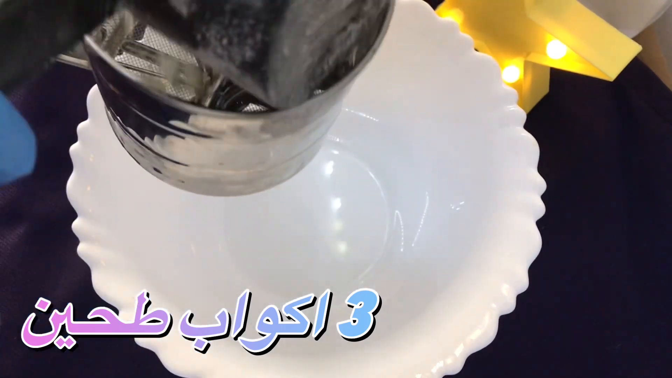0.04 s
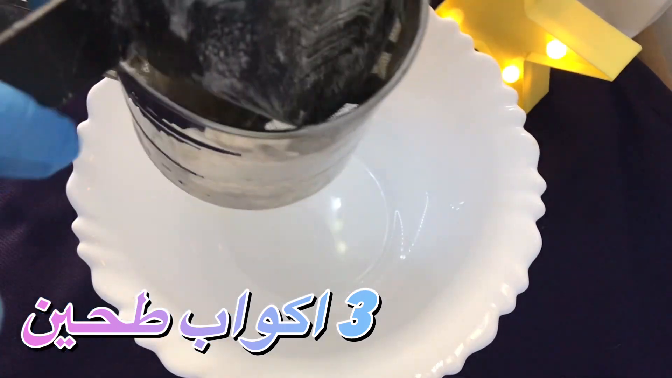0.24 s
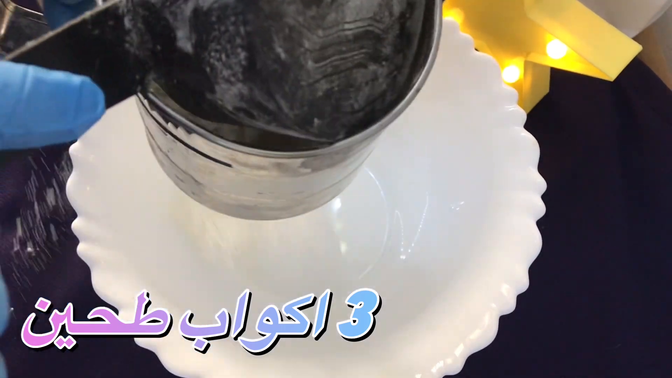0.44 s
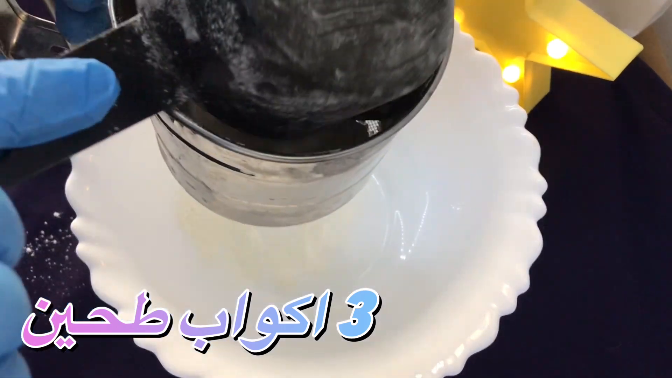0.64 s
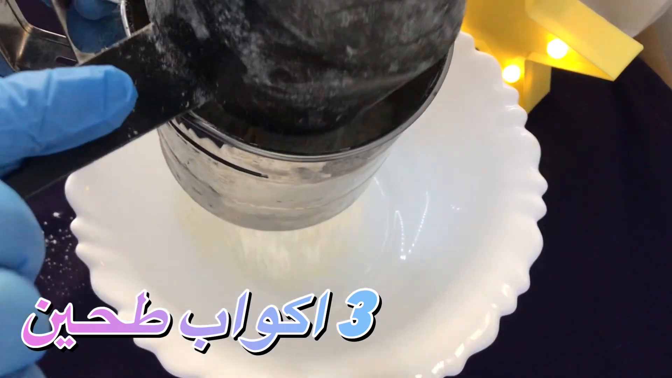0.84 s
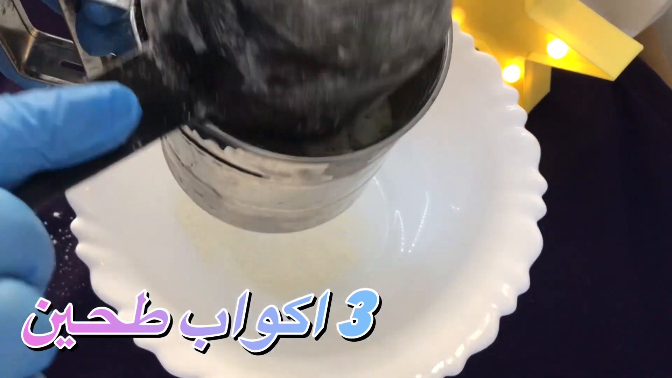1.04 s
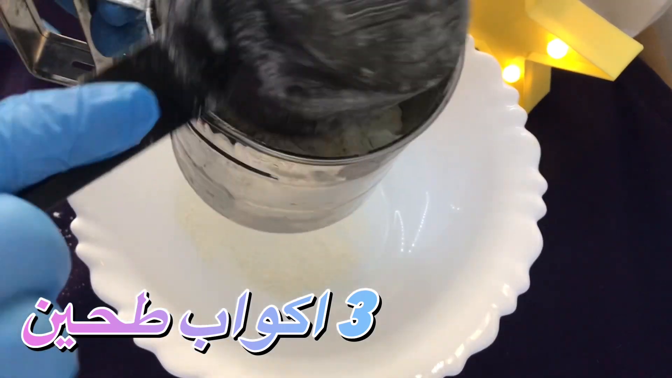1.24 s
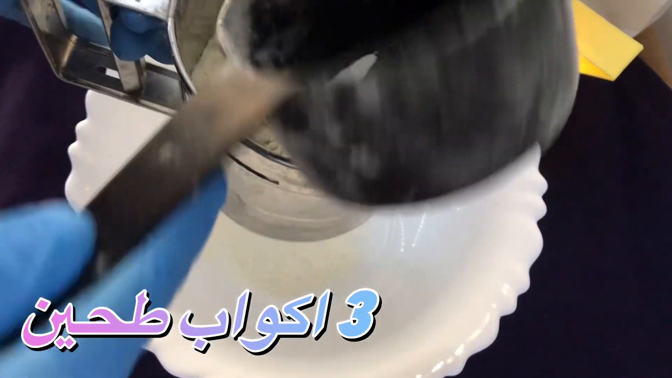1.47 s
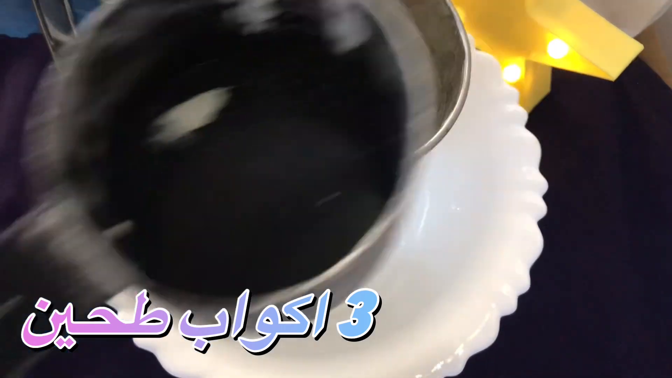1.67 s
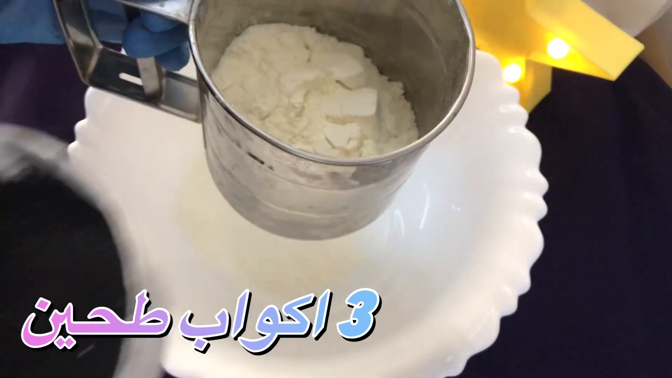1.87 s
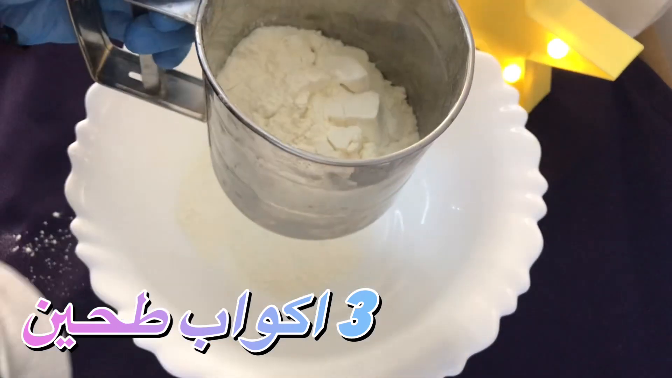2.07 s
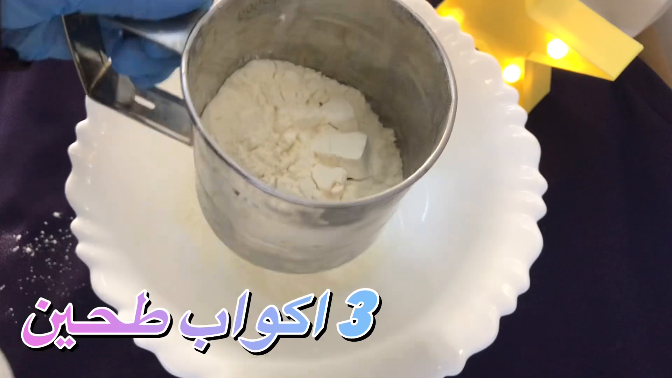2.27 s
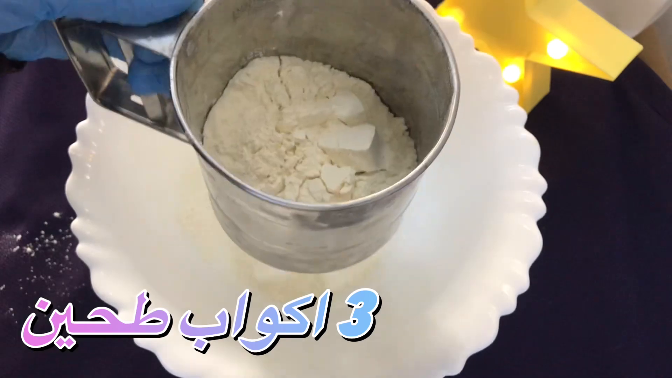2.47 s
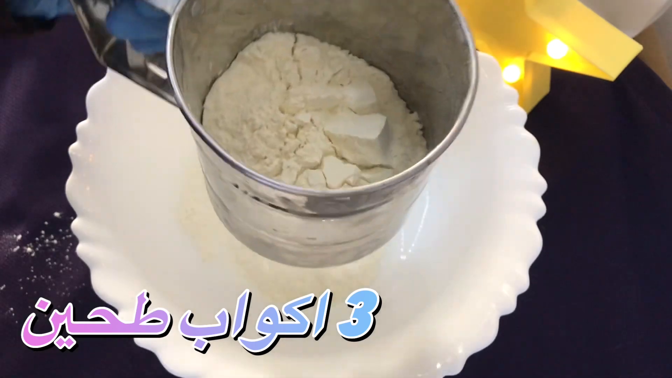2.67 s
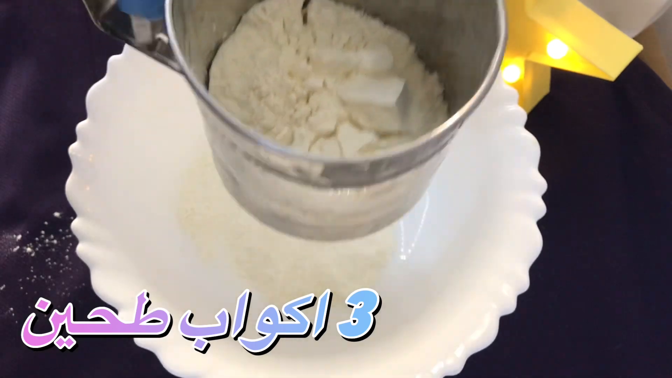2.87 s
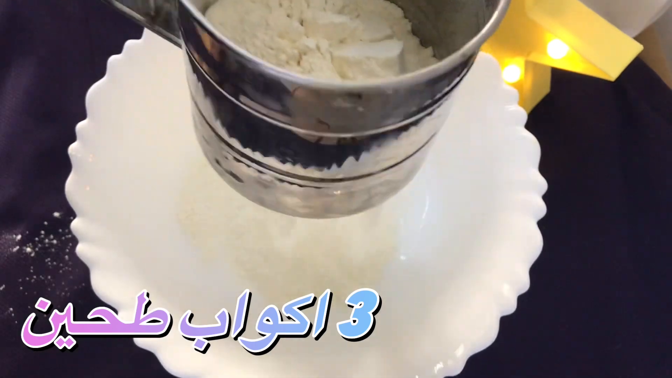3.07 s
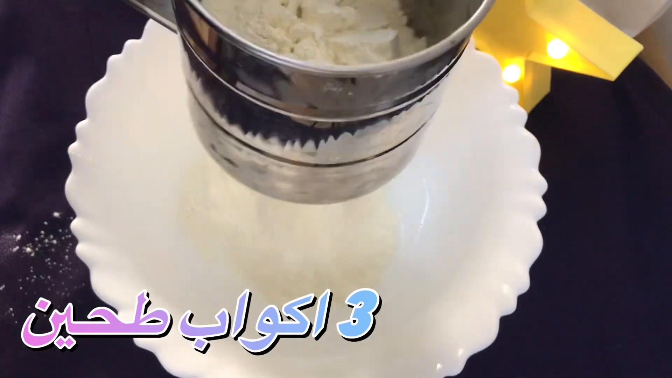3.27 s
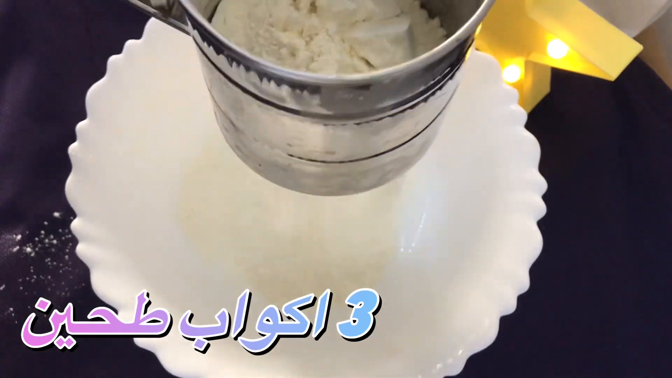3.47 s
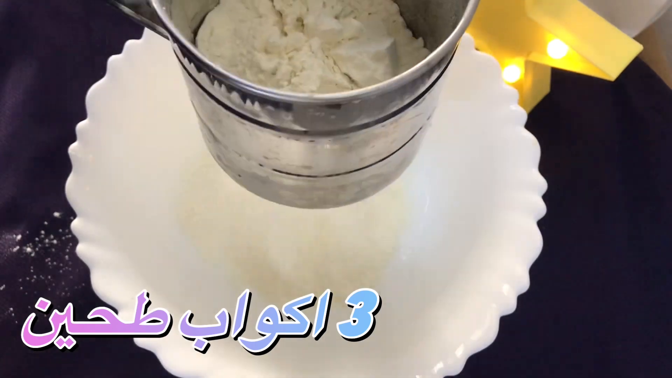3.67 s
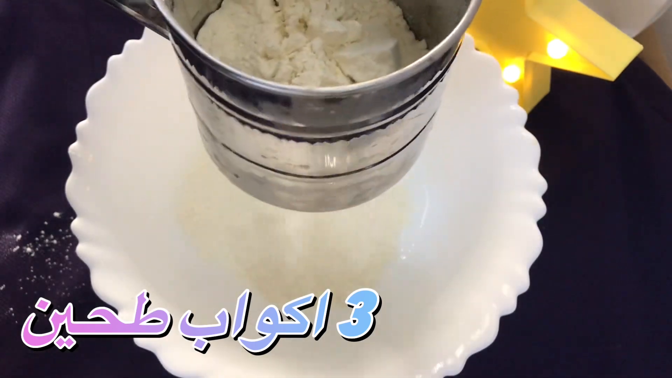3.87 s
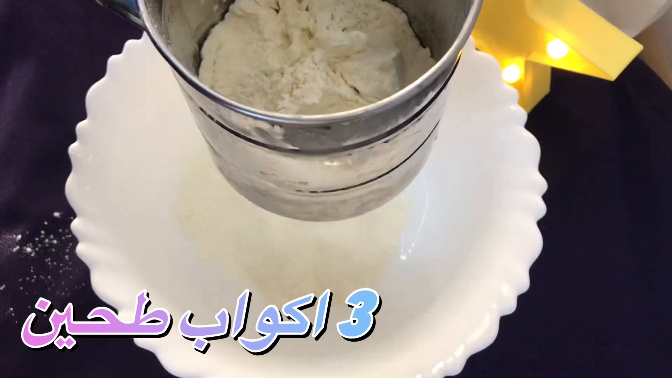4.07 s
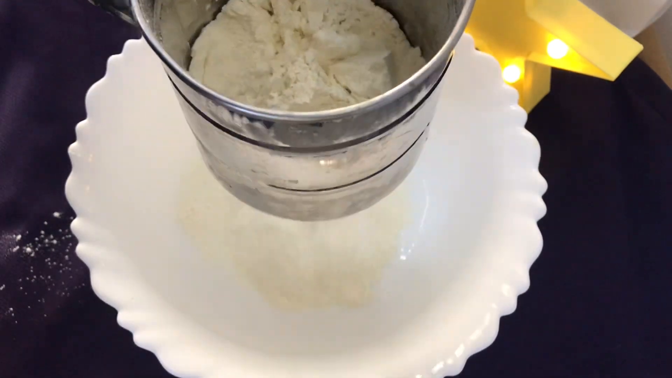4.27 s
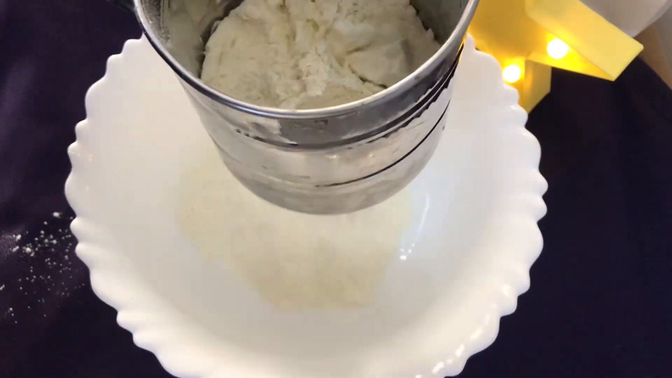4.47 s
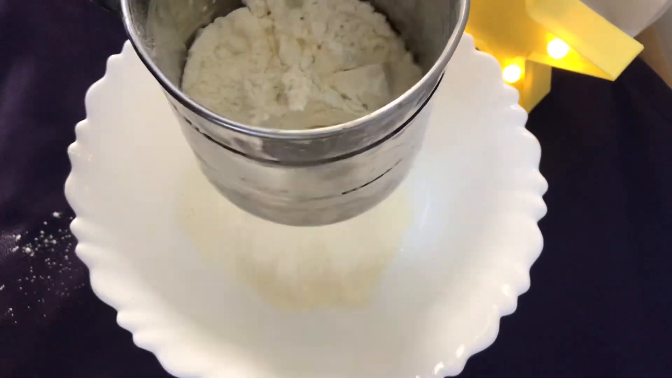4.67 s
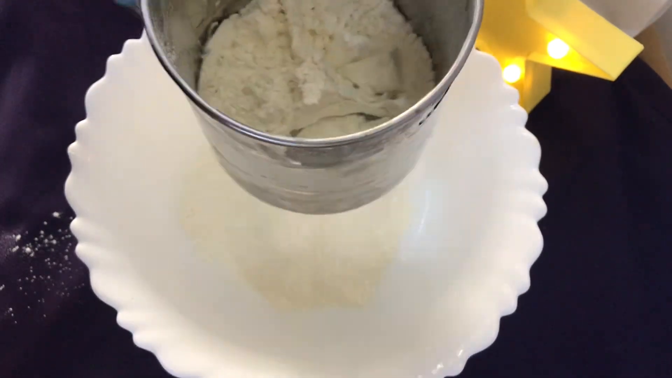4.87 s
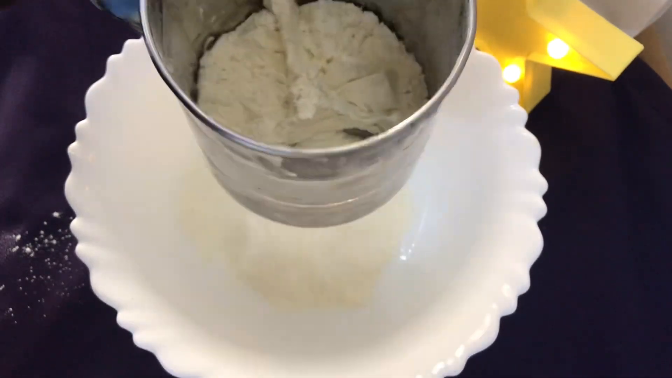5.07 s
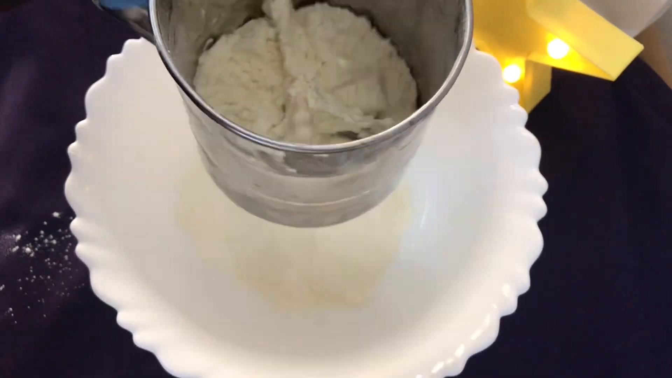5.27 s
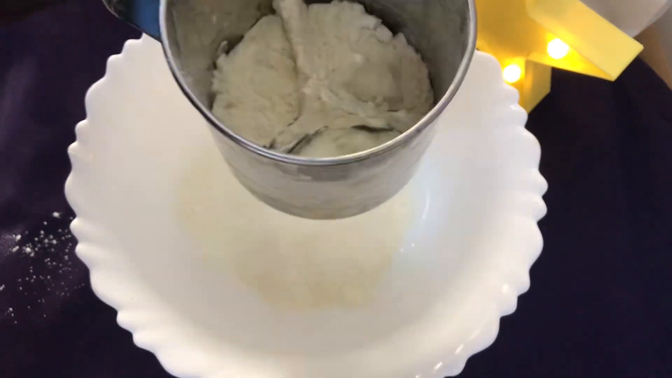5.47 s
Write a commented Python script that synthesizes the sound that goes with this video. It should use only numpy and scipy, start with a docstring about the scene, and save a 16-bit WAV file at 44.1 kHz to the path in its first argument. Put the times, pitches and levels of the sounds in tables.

```python
"""Sifting flour

A scoop of flour is tipped into a steel hand sifter and knocked twice against it, in a small kitchen.
Then the trigger is squeezed over and over, up to about six times a second: the linkage clicks, and the
blade scrapes flour over the mesh at the bottom of the cup. A faint low drone, like a distant engine,
climbs underneath. Clicks and knocks are short dying tones; scrapes are dense trains of tiny slips.
"""
import sys
import numpy as np
from scipy import signal
from scipy.fft import rfft, irfft
from scipy.io import wavfile

SR = 44100
rng = np.random.default_rng(int(sys.argv[2]) if len(sys.argv) > 2 else 0)


def to_wav(s):
    """Save 16-bit WAV."""
    ch = np.atleast_2d(s).T  # columns
    pcm = np.round(np.clip(ch, -1, 1) * 32767)  # PCM
    wavfile.write(sys.argv[1], SR, pcm.astype(np.int16))


N = 243431  # length in samples, about 5.5 s
TIME = np.arange(N) / SR


def amp(db):
    """Decibels to gain."""
    return 10 ** (np.asarray(db) / 20)


def unit(x):
    """Scales to rms 1."""
    return x / np.sqrt(np.mean(x ** 2) + 1e-20)


def read(points, hz):
    """Reads a table of (f/Hz, value) between its points, on a log-frequency axis."""
    f, value = np.transpose(points)
    return np.interp(np.log(hz + 1), np.log(f + 1), value)


def add(mix, s, sound):
    """Mixes a sound in at time s, cut off where the mix ends."""
    part = mix[round(s * SR):][:len(sound)]
    part += sound[:len(part)]


def noise(points):
    """Steady noise of rms 1 with this spectrum."""
    spectrum = rfft(rng.standard_normal(N))
    hz = np.fft.rfftfreq(N, 1 / SR)
    return unit(irfft(spectrum * amp(read(points, hz)), N))


def ring(points, treble_db=0, size=2048):
    """The ring, of energy 1, of a body with this spectrum, as early as it can be; treble_db lifts its top."""
    hz = np.fft.rfftfreq(size, 1 / SR)
    treble_share = hz ** 4 / (hz ** 4 + 8000. ** 4)
    log_gain = np.log(amp(read(points, hz) + treble_db * treble_share))
    circle = np.concatenate([log_gain, log_gain[-2:0:-1]])
    # the Hilbert transform gives the phase that puts nothing before the start
    h = np.fft.ifft(np.exp(np.conj(signal.hilbert(circle)))).real
    return h / np.linalg.norm(h)


def struck(modes, contact_hz, rise_cycles):
    """Damped modes swell within a cycle or so; neighbours start in opposite sense and beat."""
    t = np.arange(SR // 10) / SR
    out = np.zeros(len(t))
    for k, (hz, db, t60) in enumerate(modes):
        softened = amp(db) / np.hypot(1, hz / contact_hz)  # a soft contact excites less treble
        swell = (1 - np.exp(-t * hz / rise_cycles)) ** 2
        decay = np.exp(-np.log(1000) * t / t60)
        out += (-1) ** k * softened * swell * decay * np.sin(2 * np.pi * hz * t)
    return out


def slips(per_s, spread_db):
    """A dense train of tiny slips, a few much larger than the rest."""
    size = amp(spread_db * np.minimum(rng.exponential(1, N), 4))
    sign = rng.choice([-1, 1], N)
    happens = rng.random(N) < per_s / SR
    return unit(size * sign * happens)


# the low drone: t/s, f/Hz, level/dB
DRONE = [(0, 65.26, -56.5), (.35, 65.92, -53.5), (.55, 63.22, -59.5), (.75, 67.15, -51.5),
         (.87, 64.73, -63), (1.02, 67.86, -42.5), (1.11, 67.98, -45), (1.22, 69.1, -55),
         (1.9, 70.34, -67.5), (2.35, 75.93, -60), (2.55, 77.6, -48.5), (3.4, 82.45, -54.5),
         (3.699, 85.1, -49), (4.2, 87.32, -54), (4.45, 88.6, -60), (4.65, 92.35, -52), (5.1, 90.6, -64),
         (5.52, 90.8, -68)]
# colour of the rumble: f/Hz, level/dB
RUMBLE_COLOUR = [(15, -44.5), (25, -15.5), (35, -6), (50, -3), (70, 1.5), (95, -4), (120, -15),
                 (200, -30.5), (400, -59.5)]
# swell of the rumble: t/s, level/dB
RUMBLE_SWELL = [(0, -56.5), (.9, -65), (1.2, -53.5), (2, -54.5), (3, -53), (4.5, -55), (5.52, -57)]
# colour of the room hiss: f/Hz, level/dB
AIR_COLOUR = [(60, -21), (125, -13), (165, -0.5), (240, -3.5), (300, -10), (420, -10.5), (650, -15),
              (950, -17), (1300, -20.5), (1700, -25.5), (3100, -31), (5000, -33.5), (7800, -36.5),
              (10500, -39), (12500, -38.5), (16000, -41)]


def background(air_db=-61, octave_db=-20, third_db=-23, waver=.012):
    """Room hiss, a swelling rumble and a wavering low drone with two overtones."""
    s, hz, db = np.transpose(DRONE)
    drift = noise([(1, 0), (8, 0), (25, -40), (100, -120)])
    pitch_hz = np.interp(TIME, s, hz) * (1 + waver * drift)
    phase = 2 * np.pi * np.cumsum(pitch_hz) / SR
    tone = np.sin(phase) + amp(octave_db) * np.sin(2 * phase) + amp(third_db) * np.sin(3 * phase)
    drone = unit(tone) * amp(np.interp(TIME, s, db))
    rumble = noise(RUMBLE_COLOUR) * amp(np.interp(TIME, *np.transpose(RUMBLE_SWELL)))
    return drone + rumble + amp(air_db) * noise(AIR_COLOUR)


# colour of the mesh: f/Hz, level/dB
MESH_COLOUR = [(500, -16.5), (1400, 2), (2050, 0.5), (2400, -8.5), (2750, 2), (3080, 3.5), (3450, -5.5),
               (3900, -2.5), (4800, -12.5), (5300, -8), (7600, -16.5), (8700, -12.5), (10400, -20),
               (12100, -19.5), (12700, -12.5), (13300, -19), (16000, -22)]


def pings(per_s, spread_db, low_hz=1300, high_hz=7000, cycles=7, count=24):
    """Single wires of the mesh, each with its own pitch, are plucked at random moments."""
    t, out = np.arange(SR // 40) / SR, np.zeros(N)
    for hz in np.geomspace(low_hz, high_hz, count):
        at = rng.integers(0, N, round(per_s * N / SR / count))
        strength = amp(spread_db * np.minimum(rng.exponential(1, len(at)), 3))
        plucks = np.bincount(at, strength, N)
        wire = np.exp(-t * hz / cycles) * np.sin(2 * np.pi * hz * t)
        out += amp(read(MESH_COLOUR, hz)) * signal.oaconvolve(plucks, wire)[:N]
    return unit(out)


# colour of the rubbed cup: f/Hz, level/dB
CUP_COLOUR = [(100, -30), (280, -11), (440, -9.5), (580, 0.5), (850, 2), (980, -5.5), (1150, -10.5),
              (1450, -13.5), (1800, -20), (2500, -34.5), (6000, -57.5)]


def rubbing(rows, edge_db, fade_s, spread_db, catch_db, ping_db):
    """Flour slips in countless small jerks that sound the cup and the mesh, swelling and fading per row."""
    cup_level, mesh_level = np.zeros((2, N))
    for start, peak, fade_start, cup_db, mesh_db in rows:
        corners = [start - fade_s, start, peak, fade_start, fade_start + fade_s]
        swell = np.interp(TIME, corners, [0, amp(edge_db), 1, amp(edge_db), 0])
        cup_level += amp(cup_db) * swell
        mesh_level += amp(mesh_db) * swell
    jerks = slips(per_s=7000, spread_db=spread_db)
    # the rubbing catches on the wires and frees itself every few ms
    catches = amp(catch_db * noise([(20, -10), (60, 0), (250, 0), (700, -25), (3000, -80)]))
    grit = unit(catches * (jerks + 0.64 * rng.standard_normal(N)))
    hiss = signal.oaconvolve(grit, ring(MESH_COLOUR))[:N]
    rasp = unit(hiss + amp(ping_db) * pings(per_s=490, spread_db=1.5))
    rub = signal.oaconvolve(cup_level * jerks, ring(CUP_COLOUR))[:N]
    return rub + mesh_level * rasp


# flour sliding from the scoop: start t/s, peak t/s, start of the fade t/s (the peak may fall inside the fade),
# cup rub level/dB, mesh hiss level/dB
POURS = [(.03, .24, 0.35, -70, -72), (.49, .58, 0.56, -68, -73), (1.15, 1.17, 1.168, -48, -64)]


def pouring():
    """Flour slides from the scoop into the sifter and rubs on cup and mesh."""
    return rubbing(POURS, edge_db=-14.5, fade_s=.03, spread_db=4.5, catch_db=1.2, ping_db=-9.0)


# how long the kitchen rings, as the time to fall by 60 dB: f/Hz, t60/s
ROOM_T60 = [(150, 0.44), (700, 0.62), (1500, .36), (4000, .3), (12000, 0.32)]
# first reflections from table and walls: delay t/s, level/dB before echo_db is added
ECHOES = [(.0205, -29), (.024, -25), (.029, -31), (.036, -28.5), (.049, -25), (.056, -29.5), (.071, -22.5)]


def kitchen(x, tail_db=-20.5, echo_db=-3, build_s=.015):
    """A few reflections, and a diffuse tail that dies away at its own pace in each pitch range."""
    hz, t, z = signal.stft(rng.standard_normal(SR), SR, nperseg=256)
    decay = np.exp(-np.log(1000) * t / read(ROOM_T60, hz)[:, None])
    tail = signal.istft(z * decay, SR)[1]
    tail *= np.minimum(np.arange(len(tail)) / SR / build_s, 1) ** 2
    response = amp(tail_db) * tail / np.linalg.norm(tail)
    for delay, db in ECHOES:
        add(response, delay, [amp(db + echo_db)])
    return signal.fftconvolve(x, response)[:N]


# what the flour-damped cup rings with when knocked or dragged on: f/Hz, level/dB, t60/s
KNOCK_MODES = [(533.7, -6, 0.01), (554.4, -5, 0.038), (728.4, -2.5, 0.028), (820.4, -8, 0.025),
               (1174, -22.5, 0.015), (1390, -24.5, 0.019), (1609, -27, 0.017), (2030, -33.5, 0.015),
               (2270, -31, 0.009), (2810, -32.5, .014), (3404, -42, 0.01), (4116, -39, .012),
               (4490, -42, 0.013), (5580, -43, 0.00714), (7935, -41.5, .002), (12150, -45.5, .004)]
# the scoop's edge dragged along the rim: t/s, level/dB
DRAG = [(.42, -82.5), (.5, -67.5), (.6, -63.5), (.65, -57.5), (.7, -73), (.82, -76.5)]
# the hand shifts on the handle with a soft low thump: t/s, level/dB
THUMPS = [(.298, -39.5), (0.354, -43)]
# what the handle rings with: f/Hz, level/dB, t60/s
HANDLE_MODES = [(186, -2, 0.025), (272, -1, 0.026), (360, -6.5, 0.019)]


def handling(spread_db=4.0):
    """The scoop drags on the rim, slipping in tiny jerks that sound the hollow cup; the grip thumps."""
    s, db = np.transpose(DRAG)
    cup = struck(KNOCK_MODES, contact_hz=900, rise_cycles=0.21)
    hollow = signal.oaconvolve(slips(per_s=1500, spread_db=spread_db), cup)[:N]
    out = unit(hollow) * np.interp(TIME, s, amp(db), 0, 0)
    for at, thump_db in THUMPS:
        add(out, at, amp(thump_db) * struck(HANDLE_MODES, contact_hz=800, rise_cycles=.4))
    return out


# blows on the sifter, from the scoop or a falling lump: t/s, level/dB, contact corner f/Hz (higher is harder)
KNOCKS = [(.354, -40, 6000), (.574, -35.5, 400), (.637, -38.5, 301), (.769, -42.5, 306), (0.946, 0.5, 387),
          (1.1426, 0, 4670)]


def knocks(rise_cycles=0.14):
    """Each blow draws a short hollow knock from the flour-damped cup."""
    out = np.zeros(N)
    for s, db, contact_hz in KNOCKS:
        add(out, s, amp(db) * struck(KNOCK_MODES, contact_hz, rise_cycles))
    return out


# colour of the linkage's tick: f/Hz, level/dB
TICK_COLOUR = [(300, -18.5), (1100, -13), (2000, -2), (2800, -2), (3400, -1), (4100, 4), (4800, -6),
               (5600, 0.5), (6700, 0), (7700, -3.5), (8600, -1.5), (10200, -5), (12200, 0), (12700, 5),
               (13300, -4), (16000, -7)]
# the steel wall under a click: f/Hz, level/dB, t60/s
WALL_MODES = [(1172, 5, 0.015), (1489, -2, 0.022), (2026, 1.5, 0.01), (2664, -11, 0.027),
              (3065, -7.5, 0.023)]
# the flour-laden cup under a click: f/Hz, level/dB, t60/s
CUP_MODES = [(617, -2, 0.021), (809, -1, 0.022), (953, -3.5, 0.018)]


def tap(tick_db, clack_db, thud_db, treble_db, chatter, chatter_s, vary_db=3, lag_s=0.00081):
    """Steel snaps on steel and chatters for a few ms; just after, the wall clacks and the cup thuds."""
    out, t = np.zeros(SR // 10), np.arange(SR // 50) / SR
    contact = chatter * rng.standard_normal(len(t)) * np.exp(-t / chatter_s)
    contact[0] = 1
    tick = signal.fftconvolve(contact, ring(TICK_COLOUR, treble_db=treble_db))
    # each tap lands a little differently and favours other modes of the wall
    wall = [(hz, db + vary_db * rng.standard_normal(), t60) for hz, db, t60 in WALL_MODES]
    clack = struck(wall, contact_hz=6000, rise_cycles=1.0)
    thud = struck(CUP_MODES, contact_hz=2500, rise_cycles=1.0)
    for s, db, sound in (0, tick_db, tick), (lag_s / 2, clack_db, clack), (lag_s, thud_db, thud):
        add(out, s, amp(db) * sound / np.linalg.norm(sound))
    return out


# squeezes of the trigger: t/s, length t/s, snap level/dB, snap brightness level/dB,
# wall clack level/dB, blade rub level/dB
SQUEEZES = [(2.0732, 0.1, -36, -5, -25.5, -44.5), (2.2913, .18, -34.5, -10, -35.5, -53.5),
            (2.59, 0.14, -41, -13, -28.5, -50.5), (2.8437, .2, -34, 3, -37, -52),
            (3.1444, 0.081, -41, -5, -27.5, -42), (3.3093, 0.12, -27.5, -14, -32.5, -48.5),
            (3.495, 0.1, -41.5, -16, -35, -47), (3.676, 0.11, -30, -16, -31, -49),
            (3.852, 0.089, -30.5, -7, -29, -45), (4.016, .1, -25.5, -12, -31.5, -46),
            (4.1989, 0.11, -24, -12.5, -27.5, -45), (4.367, 0.1, -26, -15, -35, -46),
            (4.524, 0.076, -35.5, -14, -35, -41), (4.7125, 0.092, -25.5, -7, -32.5, -43.5),
            (4.872, 0.079, -21, -8, -24.5, -40.5), (5.0489, 0.096, -23.5, -16, -32.5, -43.5),
            (5.2296, 0.083, -31, -18.5, -32.5, -40.5), (5.3968, .098, -25, -18, -36, -42.5)]


def trigger(thud_over_clack_db=4, rebound_s=.011, rebound_db=-15):
    """Each squeeze opens with a snap of the linkage and a faint rebound as the slack closes."""
    out = np.zeros(N)
    for s, _, snap_db, bright_db, clack_db, _ in SQUEEZES:
        thud_db = clack_db + thud_over_clack_db
        for delay, db in (0, 0), (rebound_s * rng.uniform(0.41, 1.3), rebound_db):
            click = tap(snap_db, clack_db, thud_db, bright_db, chatter=0.68, chatter_s=0.0036)
            add(out, s + delay, amp(db) * click)
    return out


# the blade starts once the slack is taken up, and is fastest after a wind-up plus a share of the squeeze
SLACK_S, WIND_UP_S, FASTEST_SHARE = 0.014, 0.029, 0.32
# hiss of the mesh against the rub of the cup; it gains as the flour drains
MESH_DB, MESH_DB_PER_S = -16, 0.81


def sifting():
    """Each squeeze sweeps the blade once, scraping flour over the mesh."""
    sweeps = []
    for s, length, *_, rub_db in SQUEEZES:
        fastest = s + WIND_UP_S + FASTEST_SHARE * length
        hiss_db = rub_db + MESH_DB + MESH_DB_PER_S * s
        sweeps.append((s + SLACK_S, fastest, s + length, rub_db, hiss_db))
    return rubbing(sweeps, edge_db=-11, fade_s=0.011, spread_db=3.5, catch_db=1.3, ping_db=-2)


# the blade bumps against the cup, or a lump drops into it: t/s, thud level/dB, metal tick level/dB
BUMPS = [(2.5263, -28, -58), (2.8993, -20.5, -40.5), (2.9799, -12.5, -32.5), (3.9084, -22, -47),
         (4.2714, -19, -38), (4.5723, -16.5, -38), (4.598, -13, -27.5), (4.7494, -18, -58),
         (4.9214, -16.5, -41), (4.9412, -14, -26), (5.2584, -29, -39), (5.3029, -12.5, -29.5)]


def bumps(clack_under_thud_db=-11):
    """Duller taps that mostly sound the laden cup."""
    out = np.zeros(N)
    for s, thud_db, tick_db in BUMPS:
        clack_db = thud_db + clack_under_thud_db
        add(out, s, tap(tick_db, clack_db, thud_db, treble_db=-18.5, chatter=.29, chatter_s=.0037))
    return out


def scene():
    """Scoop and sifter close by, in the kitchen."""
    near = pouring() + handling() + knocks() + trigger() + sifting() + bumps()
    return (background() + near + kitchen(near))[None]


def record(dry, edge_hz=15950):
    """Takes away the treble above edge_hz with a steep filter."""
    lowpass = signal.firwin(511, edge_hz, window=("kaiser", 9), fs=SR)
    return signal.oaconvolve(dry, lowpass[None], "same")


dry = scene()
out = record(dry)
to_wav(out)
```